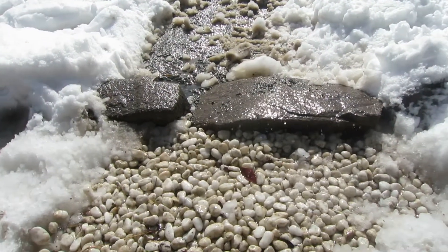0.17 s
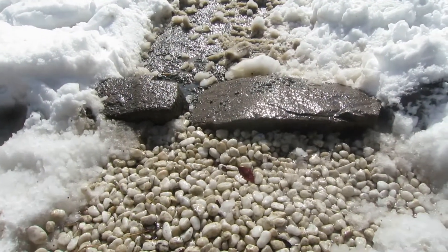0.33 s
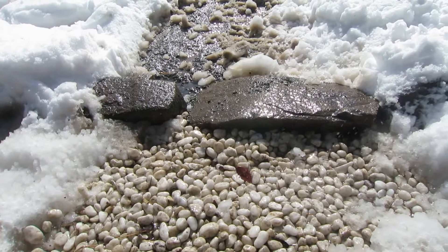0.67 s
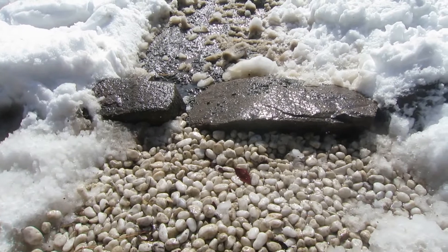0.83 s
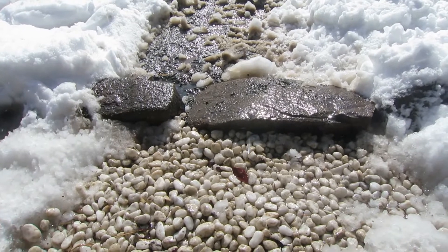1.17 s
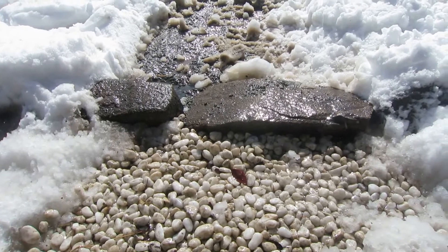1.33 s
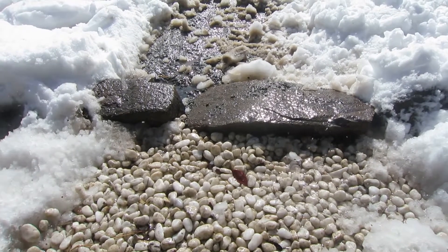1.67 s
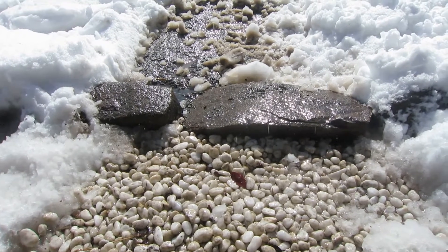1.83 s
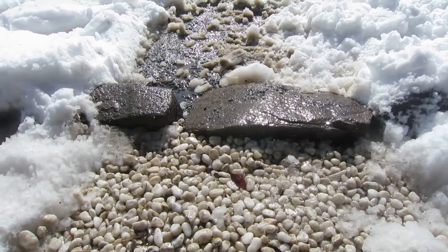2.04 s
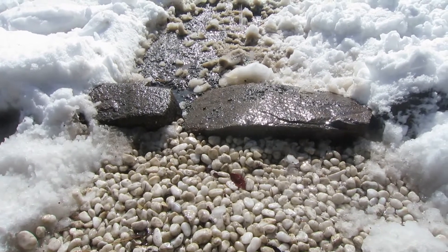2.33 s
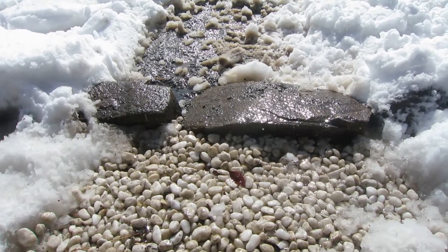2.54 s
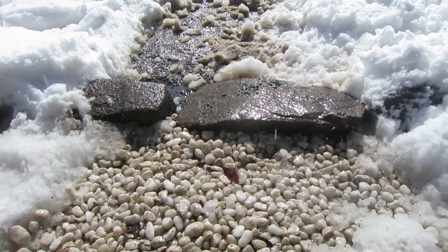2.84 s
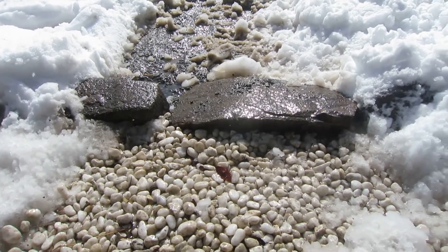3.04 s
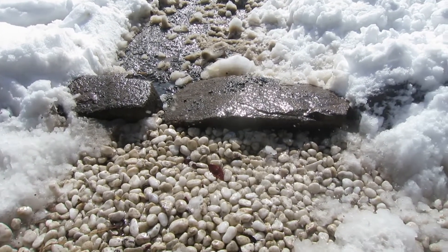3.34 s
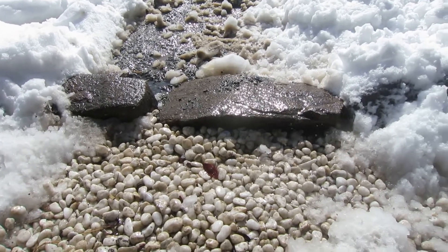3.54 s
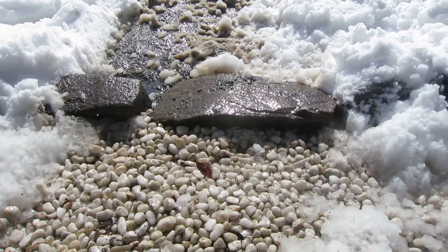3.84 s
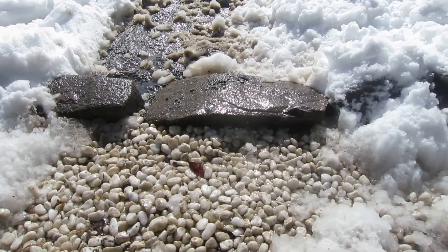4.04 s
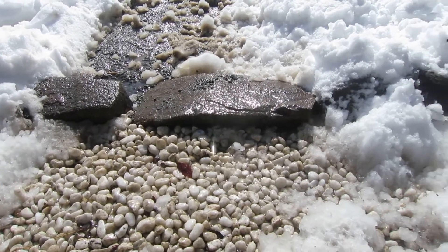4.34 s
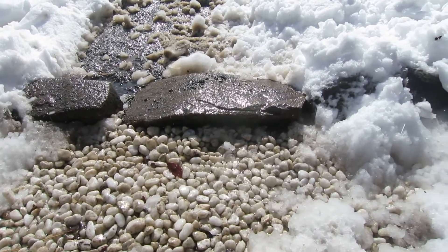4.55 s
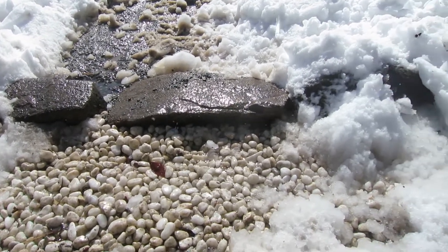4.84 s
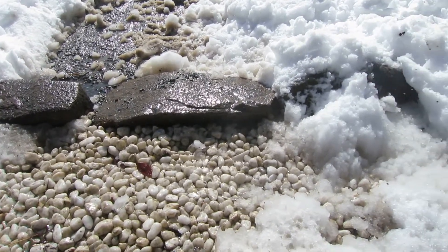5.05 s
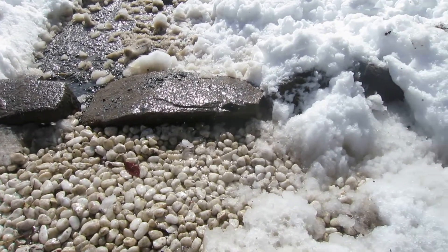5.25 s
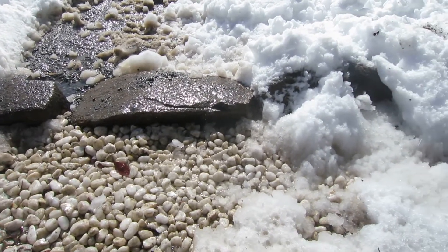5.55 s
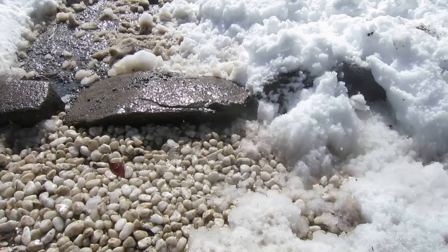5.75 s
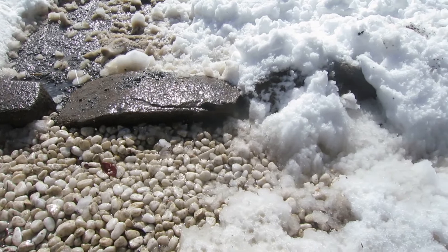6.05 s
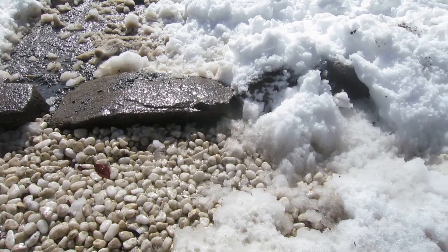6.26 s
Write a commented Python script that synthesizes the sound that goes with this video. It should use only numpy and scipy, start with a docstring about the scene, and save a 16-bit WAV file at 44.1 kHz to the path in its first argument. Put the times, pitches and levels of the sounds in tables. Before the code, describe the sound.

Close outdoor dripping of meltwater from a roof edge onto wet stone, pebbles and slush, already under way at the start. From 0 to 1 s the drops come thick and irregular, around twenty or more a second, each a dry, bright crack with a split-second watery ring, a short splash and tiny ticking droplets after it. Strong splats cluster near 0.9 s, then it eases slightly around 1.1 s. Between 1.5 and 2.5 s come several loud, snappy hits, with small rising bubble plips near 1.5 and 2.1 s. More bubbles burble around 3.25 s; a hard splat strikes at 3.8 s and another cluster at 4.4 s. From 4.5 to 5.9 s drops are sparser and mostly softer, after one strong hit at 4.75 s. The patter recovers slightly, ending on a sharp drop near 6.4 s. Soft slush thuds, fine spray and a very faint airy hush lie beneath, spread wide.

```python
"""Below a roof edge outdoors, just in front of a camera: meltwater falls onto wet stone, gravel and snow.
Each drop is noise shaped into a crack, a ringing water pocket and a splash; droplets tick down after it.
Trapped bubbles are short rising tones in a noisy froth; dull drops thud into slush as low puffs of noise.
Fine spray patters in between, over a soft hush of filtered noise and faint pats.
The camera's microphones widen the stereo in bass and treble."""
import sys
import numpy as np
from scipy import signal
from scipy.fft import rfft, irfft, next_fast_len
from scipy.io import wavfile
from scipy.ndimage import uniform_filter1d

SR = 44100
rng = np.random.default_rng(int(sys.argv[2]) if len(sys.argv) > 2 else 0)


def generate_wav(sig):
    """Save sig (samples, or channels by samples) to the path in sys.argv[1] as 16-bit PCM at SR."""
    pcm = np.round(np.clip(np.atleast_2d(sig).T, -1, 1) * 32767).astype(np.int16)
    wavfile.write(sys.argv[1], SR, pcm)


def nominal_scale(level):
    """Amplitude ratio for a level in decibels (scalar or array-like)."""
    x = np.asarray(level, float) / 20
    return 10 ** x


N = 281799  # length of the scene [samples]

# clear drops on stone and gravel; the crack is mixed with a ring at -2.5 dB and a splash at -6 dB:
# (time [s], peak level [dB], pitch of the water pocket [Hz], crack level in that mix [dB])
CLEAR_DROPS = [(0.0704, -10.5, 6240, -18), (0.0862, -10, 6170, -1), (0.1234, -9, 8550, -10),
               (0.158, -10, 5040, -29), (0.177, -18, 3330, -16), (0.2448, -13, 8500, -1),
               (0.2594, -22, 4700, -5), (0.3037, -19, 3600, -12), (0.3372, -11, 5250, -14),
               (0.3542, -5.5, 8300, 4), (0.3582, -14, 4440, -2), (0.3644, -14.5, 4300, -7),
               (0.3781, -14, 6100, -7), (0.448, -9, 8700, -10), (0.4726, -15, 6600, -2),
               (0.4926, -11, 6140, 2), (0.5724, -19, 3430, -9), (0.5866, -12.5, 4240, -4.5),
               (0.637, -13, 3430, 9), (0.6663, -12, 5900, 4), (0.723, -19, 4970, -8),
               (0.7403, -10, 8900, -3), (0.768, -17, 8320, -12), (0.7732, -7.5, 8050, -18),
               (0.7998, -13, 5700, -14), (0.852, -6.5, 3720, -13), (0.873, -6, 8800, -5),
               (0.9093, -6, 9000, 1), (0.9264, -9, 8950, 0), (0.9868, -15, 8230, -1),
               (1.0046, -19, 4910, -4), (1.026, -23, 6800, 0), (1.0782, -20.5, 3850, -9),
               (1.1074, -22, 7200, -11), (1.2152, -12.5, 8300, -4), (1.2328, -8.5, 8100, -5),
               (1.2804, -17, 8320, -11), (1.29, -10.5, 4670, 0), (1.3034, -14.5, 3730, 2),
               (1.347, -13.5, 6900, -1), (1.3786, -18, 7650, -3), (1.4075, -19, 6120, 9),
               (1.4811, -6, 6800, -5.5), (1.5115, -9.5, 3320, -1.5), (1.6132, -16.5, 7840, 2),
               (1.6626, -5, 6160, -4), (1.6677, -14, 8700, -4), (1.727, -10.5, 5100, -1),
               (1.7564, -17, 8700, -5), (1.7885, -9.5, 4640, -3), (1.8409, -6.5, 7200, -9.5),
               (1.8456, -16, 4350, -5), (1.8605, -16, 4560, -13), (1.9732, -4, 8160, -9),
               (2.034, -8.5, 3630, -7), (2.053, -12.5, 4430, -10), (2.0626, -18, 4590, -9),
               (2.1975, -9.5, 8000, -7), (2.2208, -6, 5640, -2), (2.2803, -7.5, 7260, -20),
               (2.3296, -17.5, 6800, -4), (2.4003, -9.5, 6040, 2), (2.4279, -9, 8850, 3),
               (2.4699, -4, 8470, 0), (2.4862, -16, 8690, 10), (2.5224, -13, 4470, -16),
               (2.58, -20, 8760, -15), (2.6614, -21, 6600, -15), (2.6777, -14.5, 8740, -8),
               (2.7186, -10, 4850, -8.5), (2.8036, -11, 7660, 4), (2.832, -10.5, 7750, -12),
               (2.8872, -16.5, 5350, -3), (2.9088, -10, 5640, 4), (2.9347, -13, 3400, -7.5),
               (2.9622, -10, 7000, -15), (2.9664, -20, 8630, -2), (3.007, -19, 4210, -2),
               (3.138, -23, 4240, 15), (3.1889, -18, 5830, 1), (3.2154, -13, 9000, -9),
               (3.2221, -8, 6700, -5), (3.226, -12, 5800, -2), (3.2602, -6.5, 8900, -4),
               (3.272, -13, 6840, -5), (3.2969, -12, 5400, -6), (3.3395, -14.5, 8060, 0),
               (3.4131, -7.5, 8800, -8), (3.4645, -6.5, 6070, 7), (3.5253, -8.5, 8300, 4),
               (3.602, -13, 6740, -13), (3.6377, -8, 8450, -8), (3.6434, -17, 4540, -5),
               (3.682, -15, 4570, -12), (3.6969, -14, 8550, -2), (3.73, -23, 8270, -16),
               (3.7673, -10.5, 8260, -7.5), (3.8142, -3.5, 5160, -2), (3.8476, -10, 6940, -2),
               (3.881, -19, 5050, -3), (3.943, -22, 3970, -7), (3.9671, -10.5, 5800, -3),
               (3.996, -15, 7700, -16), (4.005, -19, 8600, -11), (4.0168, -14, 3880, -13),
               (4.0492, -12.5, 5050, -7), (4.0736, -7.5, 6800, -7), (4.0931, -21, 6900, -9),
               (4.127, -12.5, 7800, -15), (4.153, -20.5, 3800, -31), (4.204, -16, 8100, -18),
               (4.2869, -14.5, 6600, -1), (4.362, -20.5, 5490, -5), (4.3787, -9.5, 7700, 2),
               (4.4176, -6, 5140, -13), (4.4248, -11, 5100, -5), (4.4344, -7, 8120, -7),
               (4.47, -15.5, 6050, -21), (4.5255, -14, 8600, 6), (4.556, -13.5, 6700, 3),
               (4.7538, -6, 4330, -7), (4.8112, -20.5, 5560, -2), (4.8805, -14.5, 7500, -5),
               (4.896, -22, 7510, 6), (5.0511, -16, 6000, -11), (5.1728, -15.5, 4200, -8),
               (5.1964, -17.5, 3970, -16), (5.2547, -16, 7300, -3), (5.4337, -12, 5400, -2.5),
               (5.4478, -9.5, 8250, -20), (5.5428, -22, 7400, -22), (5.5796, -18, 7900, -1),
               (5.6131, -14.5, 5400, 1.5), (5.7132, -15, 3900, 12), (5.7448, -18, 5400, -5),
               (5.7585, -18, 8300, -8), (5.7774, -16, 3370, -15), (5.789, -22, 8390, -2),
               (5.865, -16, 5600, 15), (5.9249, -22, 8170, -3), (5.9717, -16, 8400, 3),
               (6.0392, -20.5, 3370, 6), (6.102, -9, 7750, 6), (6.1554, -21, 8210, 5),
               (6.1735, -18, 5200, 0), (6.1918, -16, 6560, -3), (6.2554, -18, 7900, -2),
               (6.3074, -14.5, 3700, -9), (6.3834, -5.5, 7960, -1.5)]
# dull drops into slush: (time [s], peak level [dB], pitch [Hz], time to die by 60 dB [s])
SLUSH_THUDS = [(0.313, -23.5, 1750, 0.018), (0.471, -23.5, 1210, 0.0062), (0.511, -26, 557, 0.007),
               (0.588, -23, 1010, 0.009), (0.724, -17.5, 1520, 0.0055), (0.773, -23.5, 507, 0.0063),
               (0.826, -29.5, 1060, 0.007), (0.884, -28, 514, 0.01), (1.03, -30.5, 1050, 0.017),
               (1.304, -28.5, 568, 0.012), (1.384, -28.5, 1320, 0.007), (1.908, -28, 1210, 0.0083),
               (1.923, -29, 1040, 0.013), (2.051, -28, 1600, 0.007), (2.098, -25.5, 1680, 0.0089),
               (2.822, -27.5, 1070, 0.0075), (3.298, -24, 504, 0.0056), (3.411, -26, 853, 0.0083),
               (3.846, -28, 1230, 0.006), (3.969, -18, 1200, 0.0058), (4.017, -30, 1380, 0.008),
               (4.127, -22, 1220, 0.0046), (4.274, -32, 1520, 0.0085), (4.766, -26.5, 1630, 0.0099),
               (5.08, -29.5, 1200, 0.0062), (5.578, -26.5, 1690, 0.0061), (5.7, -25, 1090, 0.0053),
               (6.102, -19.5, 1770, 0.0079), (6.288, -25, 802, 0.0042), (6.307, -28, 1100, 0.007)]
# how the background swells and sinks: (time [s], spray level [dB], hush level [dB])
FLOW_LEVELS = [(0.0, -37.5, -50), (0.1, -40.5, -49.5), (0.21, -45.5, -52), (0.33, -37.5, -49.5),
               (0.76, -36.5, -46.5), (1.12, -41.5, -50.5), (1.92, -37, -45.5), (2.3, -43.5, -54.5),
               (2.53, -42.5, -53.5), (3.2, -42.5, -50), (3.31, -39, -49), (4.0, -41, -51),
               (4.22, -42.5, -53), (4.66, -42.5, -53.5), (4.98, -48.5, -57.5), (5.92, -39.5, -51),
               (6.39, -38, -46)]
# tone colour of the spray's patter: (frequency [Hz], gain [dB])
PATTER_COLOUR = [(1060, 5.5), (1800, -2), (4150, 1.5), (6780, 0.5), (8870, -1), (12000, -2.5), (13600, -5),
                 (15600, -8), (16500, -38)]
# tone colour of the distant air and running melt: (frequency [Hz], level per Hz [dB])
AIR_COLOUR = [(12, -38), (20, -2), (101, 3.5), (250, 1.5), (306, -3), (874, -4), (987, -0.5), (1880, -9.5),
              (2500, -10), (3250, -8), (5500, -120)]
# treble of an impact: (frequency [Hz], gain [dB])
CRACK_COLOUR = [(6000, -30), (8500, 15), (11500, 18), (13500, 10), (16000, -39)]
# broad body of an impact: (frequency [Hz], gain [dB])
SPLASH_COLOUR = [(500, -9), (1800, -14), (3000, -0.5), (8000, 9.5), (12000, -15)]
# stereo width, side over mid for a source off centre: (frequency [Hz], gain [dB])
STEREO_WIDTH = [(60, 1), (120, 2.5), (240, 4.5), (480, 0.5), (950, -1.5), (1890, -4.5), (3770, -11),
                (7520, 2.5), (15000, 9.5)]
# treble roll-off of the microphones: (frequency [Hz], gain [dB])
MIC_ROLLOFF = [(11000, -1.5), (13500, -2.5), (15000, -4), (16000, -16), (16800, -32)]
# tone colour of the faint fizz in the spray: (frequency [Hz], level per Hz [dB])
FIZZ_COLOUR = [(1000, -21), (1800, -2.5), (4000, 0.5), (8000, -3.5), (12000, -10), (16000, -22)]
# bubbles trapped by drops in the puddle: (time [s], peak level [dB], pitch [Hz])
TRAPPED_BUBBLES = [(0.1007, -21, 3100), (0.179, -23, 2960), (0.304, -26, 3750), (0.398, -21, 3430),
                   (0.4044, -26, 3350), (0.4084, -28, 3440), (0.414, -25, 3300), (0.573, -20, 2850),
                   (0.656, -24, 2980), (0.6708, -16.5, 2700), (0.7176, -26, 2760), (0.826, -22, 2400),
                   (0.9366, -25, 3140), (1.3257, -23, 2600), (1.5015, -16, 3850), (1.511, -17, 3200),
                   (1.681, -22, 3450), (1.6902, -21, 3530), (1.698, -19.5, 3260), (2.0146, -23, 2370),
                   (2.0617, -20, 2800), (2.0778, -18, 3080), (2.0856, -20, 2530), (2.0984, -18, 2720),
                   (2.155, -20.5, 3170), (2.452, -27, 2450), (2.65, -29.5, 2770), (2.8418, -22.5, 2820),
                   (3.2075, -19, 3300), (3.2417, -23, 2500), (3.2515, -14.5, 2880), (3.265, -16.5, 2590),
                   (3.2805, -21, 2530), (3.436, -27, 3720), (3.6556, -19, 3070), (4.0245, -16, 3700),
                   (4.0317, -22, 3170), (4.4625, -27, 3020), (5.2092, -22.5, 3020), (5.2147, -25, 2990),
                   (5.3373, -23.5, 3610), (5.5893, -24.5, 3150), (5.6068, -27, 3100), (5.6138, -19.5, 3030),
                   (5.7786, -19, 3040), (5.896, -21.5, 3140), (6.0236, -19.5, 3010), (6.3162, -19.5, 3650)]


def unit(x):
    """Scale the whole array to an rms of 1."""
    return x / np.sqrt(np.mean(x ** 2) + 1e-20)


def peaked(rows):
    """Scale each row to a peak of 1."""
    return rows / (np.abs(rows).max(axis=-1, keepdims=True) + 1e-12)


def along(points, hz):
    """Read (Hz, dB) points as a smooth gain curve on a log frequency axis."""
    f, db = np.transpose(points)
    return nominal_scale(np.interp(np.log(hz + 1), np.log(f + 1), db))


def filtered(x, response):
    """Filter x by a (complex) response, given as a function of frequency in Hz."""
    m = next_fast_len(x.shape[-1] + 1024)
    spectrum = rfft(x, m) * response(np.fft.rfftfreq(m, 1 / SR))
    return irfft(spectrum, m)[..., :x.shape[-1]]


def pocket(hz, q):
    """Response of a hollow that rings at hz: a higher q rings longer and purer."""
    return lambda f: 1j * f * hz / q / (hz ** 2 - f ** 2 + 1j * f * hz / q)


def placed(s, rows, lean):
    """Add each row at its time into mid and side; lean is its share in the side."""
    at = np.round(s * SR).astype(int)[:, None] + np.arange(rows.shape[1])
    room = N + rows.shape[1] + SR
    mid = np.bincount(at.ravel(), rows.ravel(), room)[:N]
    side = np.bincount(at.ravel(), (rows * lean[:, None]).ravel(), room)[:N]
    return np.array([mid, side])


def burst(t60, rise, grainy_db, size):
    """Noise bursts, one per row: a sharp first contact, then lumpy as droplets land one by one."""
    t = np.arange(size) / SR
    noise, lumps = rng.standard_normal((len(t60), 2, size)).transpose(1, 0, 2)
    lumps = unit(uniform_filter1d(lumps, size=24))
    contact = 1 + 0.86 * np.exp(-t / 0.001)
    fade = nominal_scale(grainy_db * lumps - 60 * t / t60)
    return noise * contact * fade * (1 - np.exp(-t / rise))


def snap(wide_s, late_s, size):
    """First contact: one short pressure pulse with its rebound."""
    u = np.maximum(np.arange(size) / SR - late_s, 0) / wide_s
    return peaked(u * (2 - u) * np.exp(-u))


def ticks(s, db, low_hz, pitch_db):
    """Rough little ticks: noise bursts through hollows of chance pitch, each to a chance side."""
    pitch, life, side = rng.random((len(s), 3)).T[..., None]
    puff = burst(0.0017 + 0.027 * life, rise=0.00072, grainy_db=-0.5, size=500)
    hz = low_hz * nominal_scale(pitch_db * pitch)  # the dB here spread the pitch upwards
    sound = peaked(filtered(puff, pocket(hz, q=1.35)))
    return placed(s, sound * nominal_scale(db)[:, None], 2.6 * (side[:, 0] - 0.5))


def spray(level_db, count):
    """Farther drips: small ticks, a few much larger, on a faint fizz of noise."""
    when, size = rng.random((count, 2)).T
    patter = ticks(when * N / SR, -3.8 * np.log(size + 0.0045), low_hz=2770, pitch_db=13)
    patter = filtered(patter, lambda f: along(PATTER_COLOUR, f))
    fizz = filtered(rng.standard_normal((2, N)), lambda f: along(FIZZ_COLOUR, f))
    return nominal_scale(level_db) * (nominal_scale(-0.5) * unit(patter) + nominal_scale(-10.5) * unit(fizz))


def hush(level_db, count):
    """Distant air and running melt as noise from all sides, with faint dull pats in the slush."""
    when, size = rng.random((count, 2)).T
    pats = ticks(when * N / SR, -3.1 * np.log(size + 0.012), low_hz=400, pitch_db=13)
    pats = filtered(pats, lambda f: 1 / (1 + 1j * f / 2200) ** 2)  # dulled
    air = filtered(rng.standard_normal((2, N)), lambda f: along(AIR_COLOUR, f))
    return nominal_scale(level_db) * (nominal_scale(-0.26) * unit(air) + nominal_scale(-3.5) * unit(pats))


def faint_drops(spray_db, count):
    """Rows like CLEAR_DROPS for weaker chance drops that swell with the spray; higher pockets crack more."""
    when, size, pitch, crack = rng.random((count, 4)).T
    db = spray_db[(when * N).astype(int)] + 17 + 4.5 * np.log(size + 0.01)
    hz = 2830 * nominal_scale(7.5 * pitch)
    crack_db = -5 + 12 * (pitch - 0.5) + 8 * (crack - 0.5)
    return np.transpose([when * N / SR, db, hz, crack_db])


def drops(rows):
    """A drop hits: a sharp crack, a ringing pocket of water and a broad, longer splash, all from noise."""
    s, db, hz, crack_db = np.transpose(rows)[..., None]
    middle_hz = 4880
    # Lower pockets last longer, and harder blows die sooner, with some chance spread.
    t60 = 0.013 * (middle_hz / hz) ** 0.088
    t60 = t60 * nominal_scale(2.5 * rng.standard_normal(s.shape) - 0.27 * (db + 15.5))
    t60 = np.clip(t60, 0.004, 0.05)

    crack = burst(0.82 * t60, rise=0.00049, grainy_db=3.0, size=1500)
    crack = filtered(crack, lambda f: along(CRACK_COLOUR, f))

    bubbly = 5.05 + 160 * t60 * (3000 / hz) ** 0.45  # low, long drops trap a bubble and ring narrower
    ring = burst(1.26 * t60, rise=0.00042, grainy_db=5.0, size=1500)
    ring = filtered(filtered(ring, pocket(hz, q=bubbly)), pocket(hz, q=0.38))

    splash = burst(0.0024 + 1.23 * t60, rise=0.00066, grainy_db=9, size=1500)
    splash = filtered(splash, lambda f: along(SPLASH_COLOUR, f))

    sound = nominal_scale(crack_db) * peaked(crack) + nominal_scale(-2.5) * peaked(ring) + nominal_scale(-6) * peaked(splash)
    snap_db = -4.5 + 3.2 * rng.standard_normal(s.shape)
    snap_wide_s = 0.00003 * (middle_hz / hz) ** 0.88
    sound = peaked(sound) + nominal_scale(snap_db) * snap(snap_wide_s, late_s=0.0004, size=1500)
    lean = rng.triangular(-1.1, 0, 1.1, len(s))
    return placed(s[:, 0], nominal_scale(db) * peaked(sound), lean)


def droplets(count):
    """Every clear drop throws droplets that tick down soon after, the later the weaker."""
    s, db = np.repeat(np.transpose(CLEAR_DROPS)[:2], count, axis=1)
    delay, size = rng.exponential(size=(len(s), 2)).T
    delay = 0.0035 + 0.0097 * delay  # seconds
    db = db - 31 - 250 * delay + 4.1 * np.minimum(size, 2.5)
    return ticks(np.minimum(s + delay, N / SR), db, low_hz=2460, pitch_db=5.5)


def bubbles(count):
    """Short tones that swell, rise a little and die in froth; smaller sisters burble around each."""
    s, db, hz = np.repeat(TRAPPED_BUBBLES, count, axis=0).T
    sister = np.arange(len(s)) % count > 0  # the first of each group is the main bubble
    when, size, pitch, life, lean = rng.standard_normal((len(s), 5)).T
    s = s + sister * 0.009 * when
    db = db + sister * (-11 + 3 * size)
    hz = hz * nominal_scale(sister * 1.43 * pitch)

    # A bubble swells and dies over a number of its own cycles.
    cycles = hz[:, None] * np.arange(800) / SR
    t60_cycles = 44.6 * nominal_scale(2.4 * life)[:, None]
    shape = nominal_scale(-60 * cycles / t60_cycles) * (1 - np.exp(-(cycles / 1.25) ** 2))
    pitch_rise = 0.0014  # share of the pitch gained each cycle
    tone = np.sin(2 * np.pi * cycles * (1 + pitch_rise * (cycles / 2 - 5)))
    shiver = unit(uniform_filter1d(rng.standard_normal(tone.shape), size=40))
    tone = tone * nominal_scale(3.0 * shiver)  # the bubble's walls shiver

    froth = burst(np.full((len(s), 1), 0.024), rise=0.00093, grainy_db=4, size=800)
    froth = filtered(froth, pocket(1.22 * hz[:, None], q=3.5))
    sound = peaked(peaked(shape * tone) + nominal_scale(-4.5) * peaked(froth))
    return placed(np.clip(s, 0, N / SR), nominal_scale(db)[:, None] * sound, 0.25 * lean)


def thuds():
    """Soft landings: a puff through a low hollow that rings as long as the puff, with a broad knock."""
    s, db, hz, t60 = np.transpose(SLUSH_THUDS)[..., None]
    t60 = np.clip(t60, 0.002, 0.04)
    puff = burst(t60, rise=0.0018, grainy_db=2.5, size=1500)
    hollow = filtered(puff, pocket(hz, q=0.53 * t60 * hz))
    knock = filtered(puff, pocket(880, q=0.83))
    sound = peaked(hollow) + nominal_scale(-5.0) * peaked(knock)
    sound = filtered(sound, lambda f: 1 / (1 + 1j * f / 2900) ** 2)  # soft slush dulls it
    sound = peaked(sound) + nominal_scale(-3) * snap(0.00008, late_s=0.000814, size=1500)
    return placed(s[:, 0], nominal_scale(db) * peaked(sound), 0.51 * rng.standard_normal(len(s)))


def scene():
    """Add all sources in mid and side, shape the stereo, then turn it into left and right."""
    s, *levels = np.transpose(FLOW_LEVELS)
    spray_db, hush_db = (np.interp(np.arange(N) / SR, s, level) for level in levels)
    mix = spray(spray_db, count=800) + hush(hush_db, count=300)
    mix = mix + drops(CLEAR_DROPS) + drops(faint_drops(spray_db, count=40)) + droplets(count=3)
    mix = mix + bubbles(count=4) + thuds()
    mid, side = mix
    # The microphone ports are close: direction is a small delay, so the side turns by a quarter cycle.
    side = filtered(side, lambda f: 1j * along(STEREO_WIDTH, f))
    # The left port hears more treble.
    side = side + filtered(mid, lambda f: 0.15 * along(STEREO_WIDTH, f) * f ** 2 / (f ** 2 + 4000 ** 2))
    return np.array([mid + side, mid - side])


def roll_off(x):
    """The treble ends steeply here."""
    return signal.sosfilt(signal.butter(12, 16820, fs=SR, output="sos"), x)


def record(dry):
    """The camera takes the sound in: its microphones roll off the treble."""
    heard = filtered(dry, lambda f: along(MIC_ROLLOFF, f))
    return roll_off(heard)


dry = scene()
out = record(dry)
generate_wav(out)
```